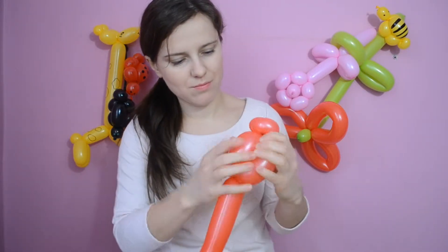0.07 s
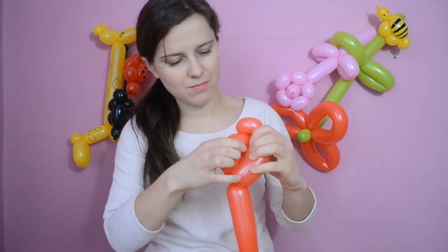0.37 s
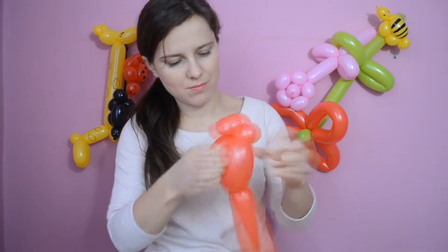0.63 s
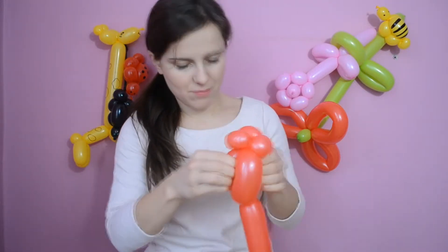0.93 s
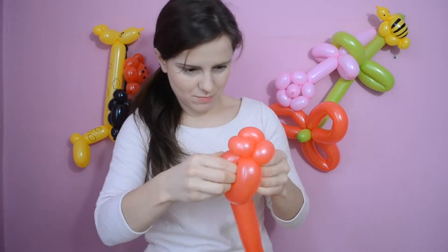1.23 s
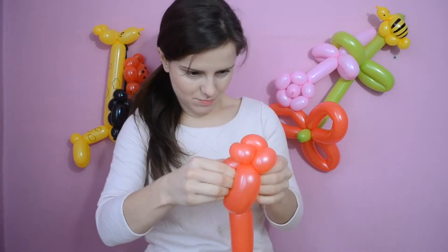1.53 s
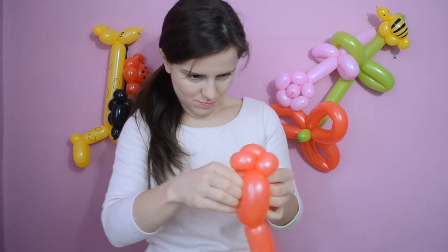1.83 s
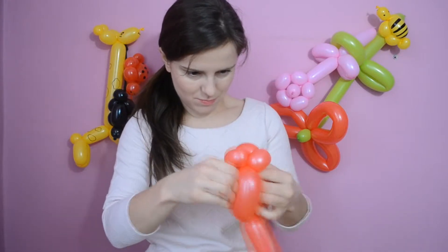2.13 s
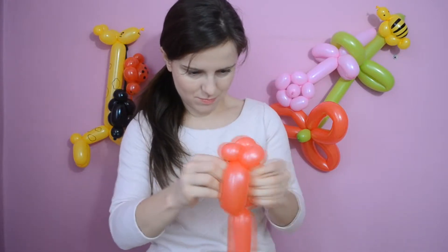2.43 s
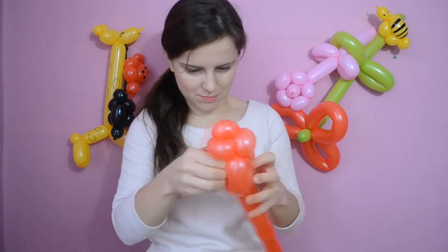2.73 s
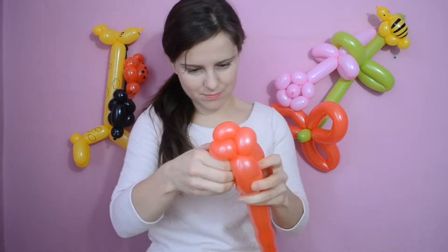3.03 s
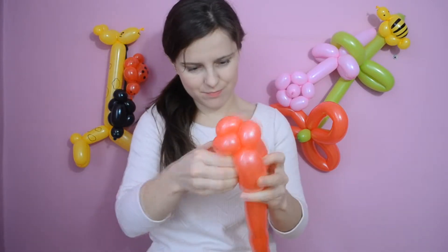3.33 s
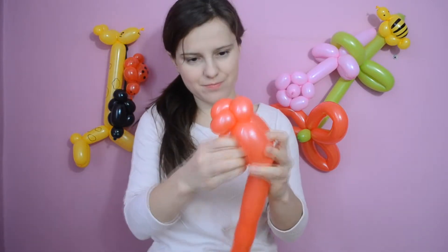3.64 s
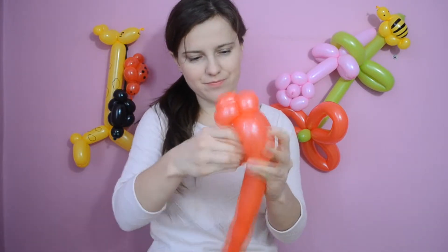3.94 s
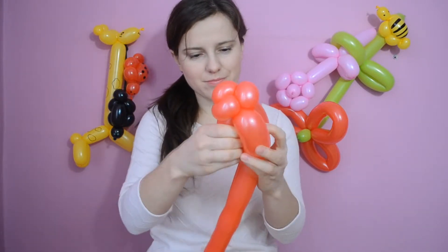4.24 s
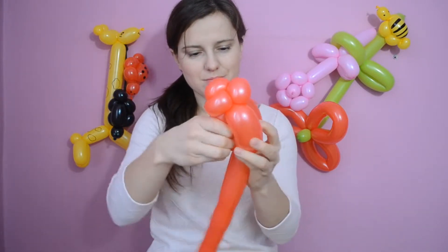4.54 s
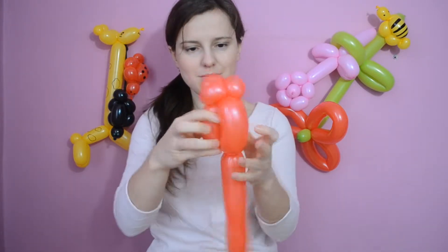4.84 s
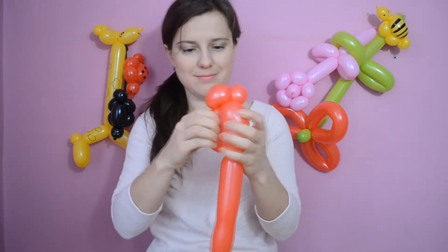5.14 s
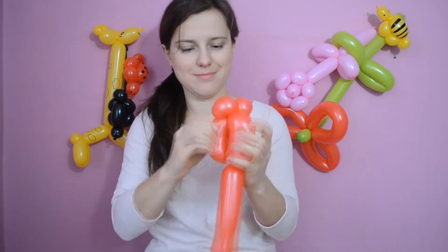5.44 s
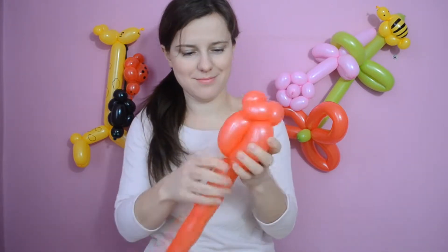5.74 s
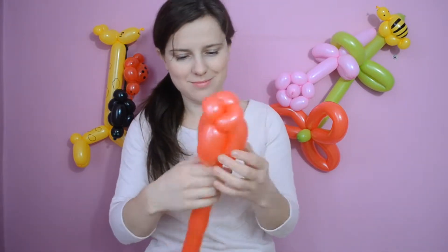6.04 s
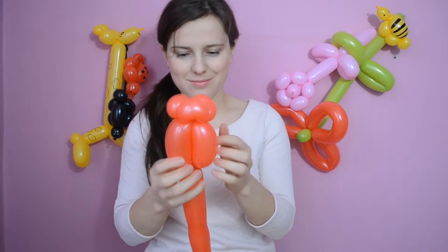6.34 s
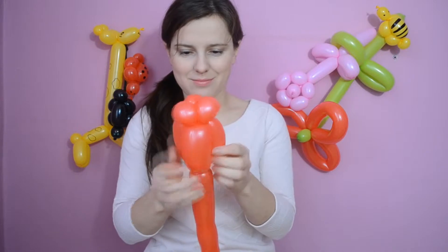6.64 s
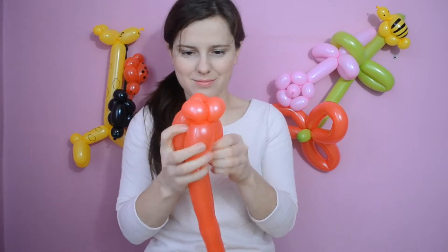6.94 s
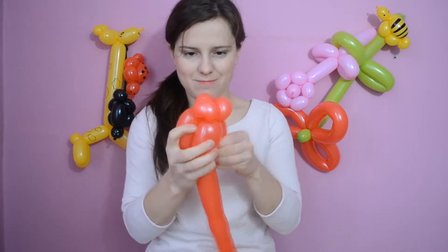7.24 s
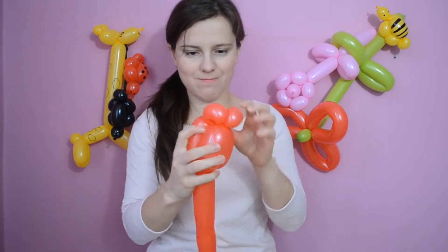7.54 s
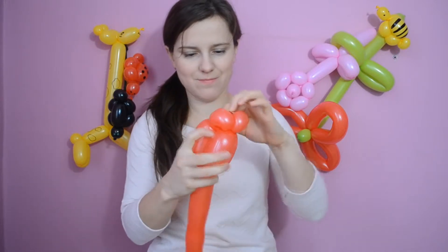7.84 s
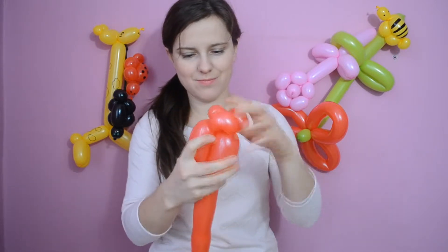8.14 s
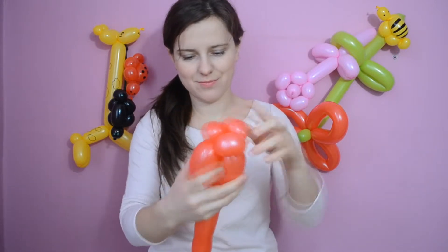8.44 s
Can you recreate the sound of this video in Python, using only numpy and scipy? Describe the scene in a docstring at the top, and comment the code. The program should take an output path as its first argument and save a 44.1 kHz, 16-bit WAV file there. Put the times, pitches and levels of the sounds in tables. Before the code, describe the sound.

A rubber modelling balloon is rubbed and twisted by hand, creaking, snapping and briefly squeaking in a small bare room.

```python
"""A small bare room, a dull camera microphone near hands that twist a latex modelling balloon.
Fingers rub from the start: rubber sticks and slips, ringing the skin and the air inside, and lets go
in lone snaps. At 0.7 s come a squeal and a creak, with a faint low thump of recorder overload; more
follow, the harder snaps and creaks the thinner. Hands bump softly near 5.8 and 6.4 s as they ease off.
From 6.8 s the rubbing swells to a hard snap at 7.3 s, then more kneading. The walls answer throughout."""
import sys
import numpy as np
from scipy import signal
from scipy.fft import rfft, irfft
from scipy.io import wavfile
from scipy.ndimage import uniform_filter1d, minimum_filter1d, map_coordinates

SR = 44100
rng = np.random.default_rng(int(sys.argv[2]) if len(sys.argv) > 2 else 0)


def write(x):
    x = np.atleast_2d(x).T
    wavfile.write(sys.argv[1], SR, np.round(np.clip(x, -1, 1) * 32767).astype(np.int16))


N = 373968
SPAN = SR // 4  # samples that hold one stroke

# Event levels are relative within a layer. "Hollow" lifts the cavity boom, "sharp" the treble.
# How hard the fingers rub the skin. Each row: time in seconds, level in dB.
RUB_LEVELS = [(0, -25.5), (.35, -33), (.48, -30.5), (.62, -37), (.82, -30), (.96, -36.5), (1.28, -32.5),
              (1.42, -35), (1.6, -28), (1.97, -34.5), (2.1, -29), (2.42, -32.5), (2.6, -33), (2.9, -37.5),
              (3.17, -30), (3.38, -31), (3.52, -25), (4.05, -33.5), (4.33, -39.5), (4.95, -32), (5.13, -44),
              (5.3, -32.5), (5.65, -43.5), (6.07, -59), (6.3, -46.5), (6.53, -58), (6.62, -42.5),
              (6.75, -44), (7.3, -24.5), (7.44, -35), (7.6, -30), (7.78, -42), (7.98, -31), (8.28, -43.5),
              (8.4, -28)]
# The grip, slack and booming or tight and bright. Each row: time in seconds, hollow in dB, sharp in dB.
GRIP_TONE = [(0, 7, -1), (.3, 0, -5.5), (.5, 10.5, 4), (.68, 8, 0), (1.35, -0.5, 6.5), (1.85, 4.5, 2),
             (2.3, 0, 6), (2.62, 4, 7), (2.87, 5.5, -5.5), (3.2, 3, 3.5), (3.65, 8.5, 3), (3.9, -1, 1),
             (4.45, 5.5, 3), (4.75, 6.5, 1), (5.1, 2.5, 0), (5.451, 10, 6), (6, 4.5, -2), (6.85, 8.5, 1),
             (7.3, -1, -5), (7.7, 8.5, -5.5), (7.9, 15, 8), (8.3, -1, -7)]
# The voice of the balloon. Each row: frequency in Hz, relative gain in dB.
BALLOON_VOICE = [(35, -53), (60, -47), (115, -37.5), (244, -24.5), (438, -6.5), (593, -10), (705, -11.5),
                 (875, -4), (1320, -2), (1500, -1.5), (2690, -3), (6250, -11), (7760, -10.5), (9420, -11.5),
                 (10500, -15), (13600, -54.5), (22000, -120)]
# The rubber lets go at once. Each row: start in seconds, level in dB, sharp in dB.
LONE_SNAPS = [(.093, -9, -0.5), (.123, -12, 4), (.297, -5.5, -5.5), (.566, -13, 2), (.985, -13, 8.5),
              (1.286, -9.5, 1), (1.374, -5.5, 6), (1.464, 1, -12), (2.327, -10, 11), (2.484, 0.5, -20),
              (2.929, -13.5, -16), (3.226, -4, 0), (3.247, -7.5, -7), (3.893, 2.5, 11), (4.108, -7, 1),
              (4.12, -3, 6), (4.612, -6, -19), (5.073, -7, -1.5), (5.388, -11, 12.5), (5.43, -11.5, 4),
              (7.336, 3.5, 2.5), (7.812, -13.5, 6), (7.824, -10, 8), (8.086, -17.5, 7.5)]
# The slipping locks to one pitch. Each row: start and length in seconds, level in dB, pitch in Hz,
# hollow in dB, sharp in dB.
SQUEAL_STROKES = [(0.682, 0.091, -18, 1417, -4, -12), (4.476, 0.028, -27.5, 1160, -1, 0),
                  (4.796, 0.024, -15, 654, 8, 1), (5.695, 0.018, -17, 609, 11.5, -8),
                  (6.781, 0.018, -44, 990, 15.5, -3)]
# Bubbles twist against each other. Each row: start and length in seconds, level in dB,
# slips per second, sharp in dB, level offset of the opening snap in dB.
CREAK_STROKES = [(.683, .026, -9.5, 307, -1.5, -1.5), (1.075, 0.011, -14, 490, 3.5, 12),
                 (1.121, 0.093, -22, 390, 2, 16), (1.221, .014, -21, 500, 5.5, 2),
                 (1.435, 0.061, -24, 430, 7, 16.5), (2.467, 0.05, -24, 500, -1, 4),
                 (2.595, 0.045, -30, 480, 12.5, -4), (2.618, 0.079, -12, 219, -1, 0),
                 (3.217, 0.033, -16.5, 160, 10.5, 6), (3.485, 0.023, -13.5, 298, -2.5, -2),
                 (3.526, 0.065, -20.5, 220, 3, 19), (3.69, 0.13, -26.5, 120, 9, 13.5),
                 (3.884, 0.049, -16, 400, 1, 18), (4.13, 0.077, -13.5, 367, -3, -8),
                 (4.474, 0.089, -28.5, 500, 5.5, 8), (4.75, 0.038, -18.5, 300, -6, 17.5),
                 (4.793, 0.023, -18.5, 550, 2, 3), (4.843, 0.027, -18, 326, -5, -2),
                 (4.907, 0.025, -19.5, 520, 1.5, 7), (5.167, 0.031, -24.5, 330, 0, 14),
                 (5.645, 0.024, -40, 450, 9, 7.5), (5.687, 0.025, -15.5, 650, -0.5, -9),
                 (5.736, 0.11, -22, 400, -4, 2), (6.132, 0.019, -39, 276, -18, 15),
                 (6.205, 0.034, -35, 510, -10, 18.5), (6.394, 0.009, -24, 490, -1.5, 1),
                 (6.563, 0.025, -37.5, 490, -0.5, 8), (7.517, 0.048, -26, 500, -4, 16.5),
                 (8.122, 0.052, -19.5, 272, -7.5, -2), (8.379, 0.0089, -21, 470, 1, 3),
                 (8.474, 0.024, -15.5, 450, 7, 7)]
# A pinched bubble rings. Each row: start and length in seconds, pitch in Hz, lift in dB.
PINCH_RESONANCES = [(0.686, 0.18, 1570, 9.5), (1.118, 0.2, 1800, 5), (2.597, 0.075, 2350, 7),
                    (3.182, 0.12, 1330, 10.5), (3.656, 0.2, 1220, 9), (4.441, 0.094, 2750, 9.5),
                    (4.696, 0.66, 900, 5.5), (5.625, 0.087, 1050, 10.5), (6.753, 0.38, 990, 5.5),
                    (7.49, 0.23, 1050, 7.5), (8.09, 0.76, 448, 12)]
# Overload thumps and two soft hand bumps. Each row: start in seconds, level in dB, pitch in Hz.
LOW_THUMPS = [(.692, -44, 70), (3.221, -37, 60), (5.833, -38, 212), (6.41, -45, 141), (7.337, -42, 70)]
# The still room. Each row: frequency in Hz, relative noise density in dB.
HUSH_SPECTRUM = [(20, -20), (150, 10), (600, 13), (10000, -64)]
# The ring of the bare walls. Each row: frequency in Hz, time to fall 60 dB in seconds.
ROOM_DECAY = [(200, 0.89), (530, 0.42), (1400, 0.47), (3700, 0.44), (9700, 0.29)]
# The microphone's uneven, dull top end. Each row: frequency in Hz, gain in dB.
MIC_RESPONSE = [(6900, -1.5), (7900, -7.5), (8500, -2), (9800, 0.5), (10500, -5.5), (11200, -7.5),
                (11800, -24)]


def amp(db):
    """Decibels to gain."""
    return 10 ** (np.asarray(db) / 20)


def unit(x):
    """x at rms 1."""
    return x / np.sqrt(np.mean(x ** 2) + 1e-20)


def along(points, hz):
    """(Hz, value) points read on a log axis."""
    freqs, values = np.transpose(points)
    return np.interp(np.log(hz + 1), np.log(freqs), values)


def wobble(rate, size=N):
    """A smooth random curve, rate knots a second."""
    return map_coordinates(rng.standard_normal(size // 64), [np.arange(size) * rate / SR], mode="wrap")


def add(track, start, x):
    """Mix x into the track from start, in seconds."""
    part = track[max(round(start * SR), 0):][:len(x)]
    part += x[:len(part)]


def causal(points, size=2048):
    """Minimum-phase impulse response with the gain of (Hz, dB) points."""
    gain = amp(along(points, np.fft.rfftfreq(size, 1 / SR)))
    cepstrum = irfft(np.log(gain))
    cepstrum[1:size // 2] *= 2
    cepstrum[size // 2 + 1:] = 0
    return irfft(np.exp(rfft(cepstrum)))


def through(x, response):
    """x convolved with an impulse response."""
    return signal.fftconvolve(x, response)[:len(x)]


def pulses(times, heights, size, order=8):
    """Band-limited impulses at the given times."""
    at = np.floor(times * SR).astype(int)[:, None] + np.arange(1 - order, order + 1)
    gap = at - times[:, None] * SR
    taps = heights[:, None] * np.sinc(gap) * np.cos(np.pi * gap / (2 * order)) ** 2
    return np.bincount(np.clip(at + order, 0, size).ravel(), taps.ravel(), size + 1)[:size]


def grip(t):
    """Hollow dB and sharp dB of the grip at time t."""
    times, hollow_db, sharp_db = np.transpose(GRIP_TONE)
    return np.interp(t, times, hollow_db), np.interp(t, times, sharp_db)


def press(x, hollow_db, sharp_db, cavity_hz=(440, 830), edge_hz=4000):
    """A slack bubble booms in its air cavity; a tight contact sharpens the treble."""
    boom = signal.sosfilt(signal.butter(1, cavity_hz, "band", fs=SR, output="sos"), x)
    treble = signal.sosfilt(signal.butter(1, edge_hz, "high", fs=SR, output="sos"), x)
    return x + (amp(hollow_db) - 1) * boom + (amp(sharp_db) - 1) * treble


def skin(slips, flutter_db, flutter_t60=0.0073, ring_t60=0.067, ring_db=-17, lap_s=.0025, lap_db=-7):
    """Each slip kicks the skin, sets off its own brief flutter and returns once around the bubble."""
    t = np.arange(SR // 20) / SR
    dying = (amp(-60 * t / flutter_t60) + amp(ring_db - 60 * t / ring_t60)) ** 2
    envelope = np.sqrt(np.abs(through(slips ** 2, dying / dying.sum())))
    flutter = envelope * rng.standard_normal(len(slips))
    shaken = (slips + amp(flutter_db) * flutter) / np.hypot(1, amp(flutter_db))
    n = np.arange(len(slips))
    path = lap_s * SR * np.exp(0.1578 * wobble(12, len(n)))  # the bubble keeps changing shape
    returned = map_coordinates(shaken, [n - path])
    return (shaken - amp(lap_db) * returned) / np.hypot(1, amp(lap_db))


def rubbing(chatter_hz=500, jitter=0.2124, spread_db=3, clump_db=3, tick_rate=60, tick_db=-10):
    """Fingertips chatter in small clumped slips, while the knot lets go in sparser, brighter ticks."""
    t = np.arange(N) / SR
    level_db = np.interp(t, *np.transpose(RUB_LEVELS))
    hollow_db, sharp_db = grip(t)
    cycles = np.cumsum(chatter_hz * np.exp(.15 * wobble(14))) / SR
    scatter, height, wait, force = rng.standard_normal((4, N // 64))
    slip_times = np.interp(np.arange(len(scatter)) + jitter * scatter, cycles, t, right=2 * t[-1])
    slips = unit(pulses(slip_times, amp(spread_db * height), N) * amp(clump_db * wobble(55)))
    chatter = press(skin(slips, flutter_db=0.5), hollow_db, sharp_db - 3.5)
    tick_times = np.cumsum(np.exp(.5 * wait)) / tick_rate
    knot_slips = unit(pulses(tick_times, amp(6.5 * np.minimum(force, 1)), N))
    ticks = press(skin(knot_slips, flutter_db=-2), 0, sharp_db + 6)
    return (chatter + amp(tick_db) * ticks) * amp(level_db)


def room_tone(level_db=-63.5):
    """The faint, low hush of the still room."""
    return amp(level_db) * unit(through(rng.standard_normal(N), causal(HUSH_SPECTRUM)))


def wall_tail(delay_s=0.0012, build_s=0.0067):
    """A diffuse tail of energy 1 that builds up after the direct sound."""
    hz, t, noise = signal.stft(rng.standard_normal(SR // 2), SR, nperseg=256)
    decay = amp(-60 * t / along(ROOM_DECAY, hz)[:, None])
    tail = signal.istft(noise * decay, SR, nperseg=256)[1]
    tail *= np.clip((np.arange(len(tail)) / SR - delay_s) / build_s, 0, 1)
    return tail / np.linalg.norm(tail)


def room(x, wet_db=-4, size=4096):
    """Behind the direct sound, bare walls answer a little differently as the balloon moves about."""
    wet, padded = np.zeros(N), np.pad(x, size)
    window = np.sin(np.pi * np.arange(size) / size)
    for start in range(-size // 2, N, size // 2):
        echo = signal.fftconvolve(padded[start + size:][:size] * window, wall_tail())
        add(wet, max(start, 0) / SR, echo[max(-start, 0):])
    return x + amp(wet_db) * wet


def snap(start, db, sharp_db, fall_db=5, gap_s=.0033, count=4, soft_db=-4):
    """One strong slip, then a few weaker ones as the rubber catches again."""
    waits = gap_s * rng.uniform(0.26, 1.6, count)
    slips = pulses(np.cumsum(waits) - waits[0], amp(-fall_db * np.arange(count)), SPAN)
    hollow_db = grip(start)[0] - max(db - soft_db, 0)  # the harder, the thinner
    return amp(db) * press(skin(slips, flutter_db=4.5), hollow_db, sharp_db)


def snaps(gain_db=8):
    """Lone snaps, and the one with which each creak breaks away."""
    out = np.zeros(N)
    breakaways = [(start, db + opening_db, sharp_db)
                  for start, _, db, _, sharp_db, opening_db in CREAK_STROKES]
    for start, db, sharp_db in LONE_SNAPS + breakaways:
        add(out, start, snap(start, db, sharp_db))
    return amp(gain_db) * out


def stroke(length, rate, uneven, spread_db, count=900):
    """A run of slips that swells and lets go, at rms 1 over its length."""
    timing, height = rng.standard_normal((2, count))
    waits = np.exp(uneven * timing - uneven ** 2 / 2) / rate
    times = np.cumsum(waits) - waits[0]
    swell = np.sin(np.pi * np.clip(0.032 + times / length, 0, 1)) ** 0.48 * (times < length)
    slips = pulses(times, swell * amp(spread_db * height), SPAN)
    return unit(slips) * np.sqrt(length * SR / SPAN)


def squeals(fade_db=4):
    """Nearly regular slips make a short harmonic cry that fades as the tension goes."""
    out, t = np.zeros(N), np.arange(SPAN) / SR
    for start, length, db, pitch_hz, hollow_db, sharp_db in SQUEAL_STROKES:
        slips = stroke(length, pitch_hz, uneven=.028, spread_db=1.2)
        add(out, start, amp(db - fade_db * t / length) * press(slips, hollow_db, sharp_db))
    return out


def creaks(lowest_hz=380, thinning=0.29, soft_db=-32):
    """Twisted rubber gives way in a rasping run of slips, carrying little bass."""
    out = np.zeros(N)
    for start, length, db, rate, sharp_db, _ in CREAK_STROKES:
        slips = stroke(length, rate, uneven=.5 * rate / 420, spread_db=0.5)  # slower runs are steadier
        hollow_db = grip(start)[0] - thinning * max(db - soft_db, 0)
        add(out, start, amp(db) * press(skin(slips, flutter_db=7), hollow_db, sharp_db))
    return signal.sosfilt(signal.butter(2, lowest_hz, "high", fs=SR, output="sos"), out)


def pinched(x, quality=4, loss=0.089):
    """While a bubble is pinched its resonance stands out, at some cost to the other frequencies."""
    out, t = x.copy(), np.arange(N) / SR
    for start, length, hz, lift_db in PINCH_RESONANCES:
        squeeze = np.sqrt(np.abs(np.sin(np.pi * np.clip((t - start) / length, 0, 1))))
        ring = signal.lfilter(*signal.iirpeak(hz, quality, SR), x)
        ringing = amp(-loss * lift_db) * (x + (amp(lift_db) - 1) * ring)
        out += squeeze * (ringing - x)
    return out


def thumps(t60=0.07, attack_s=0.00091):
    """Short low thumps: under loud, overloading slips, and soft hand bumps near 5.8 and 6.4 s."""
    out, t = np.zeros(N), np.arange(SPAN) / SR
    for start, db, hz in LOW_THUMPS:
        envelope = amp(db - 60 * t / t60) * (1 - np.exp(-t / attack_s))
        add(out, start, envelope * np.sin(2 * np.pi * hz * t))
    return out


def scene(snap_direct_db=-8.5):
    """All slips sound through the balloon into the room; more of each snap reaches the mic straight."""
    voice = causal(BALLOON_VOICE)
    voice /= np.linalg.norm(voice)
    cracks = snaps()
    slips = rubbing() + cracks + creaks() + squeals()
    balloon = through(pinched(slips), voice)
    direct_snaps = amp(snap_direct_db) * through(cracks, voice)
    hush = room_tone()
    return (room(balloon) + thumps() + direct_snaps + hush)[None]


def record(dry, ceiling=1.1, window=128, top_hz=15800):
    """A dull camera microphone, a fast limiter, clipping at full scale and the band limit."""
    heard = through(dry[0], causal(MIC_RESPONSE))
    needed_gain = ceiling / np.maximum(np.abs(heard), ceiling)
    limiter_gain = uniform_filter1d(minimum_filter1d(needed_gain, window), window)
    clipped = np.clip(heard * limiter_gain, -1, 1)
    passband = np.fft.rfftfreq(N, 1 / SR) < top_hz
    return irfft(rfft(clipped) * passband, N)[None]


dry = scene()
out = record(dry)
write(out)
```